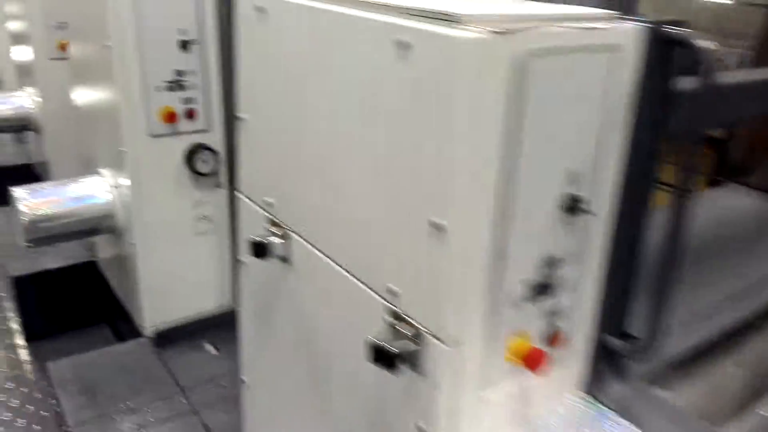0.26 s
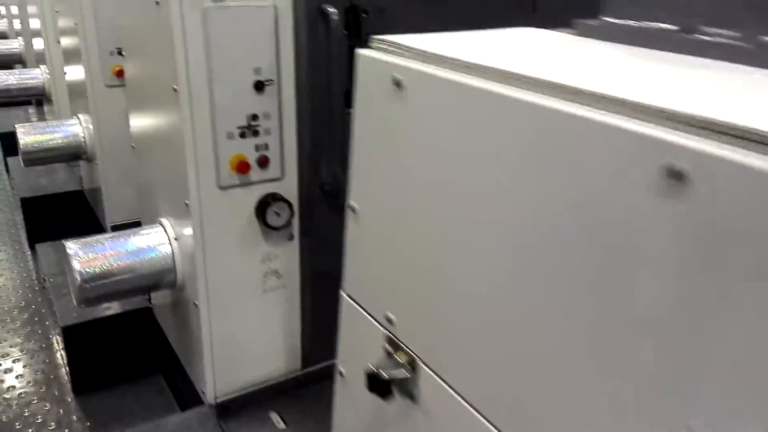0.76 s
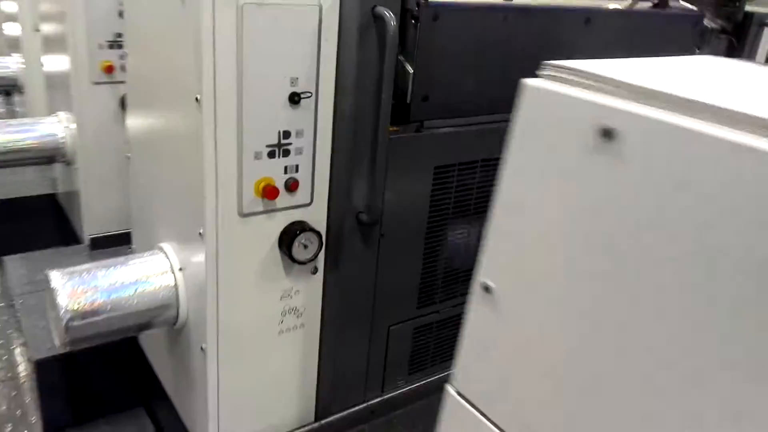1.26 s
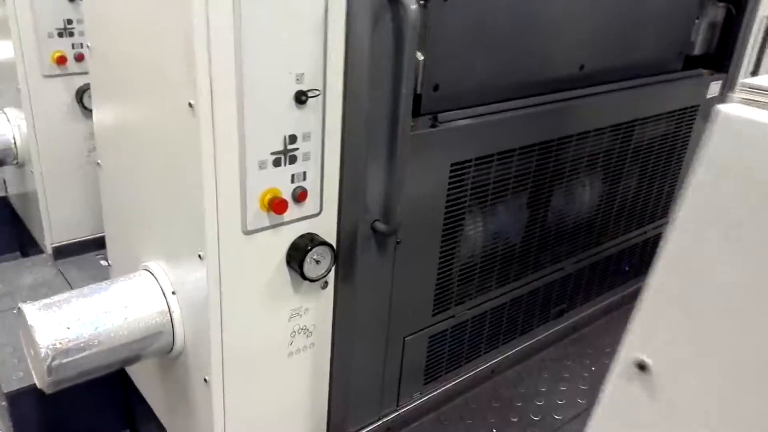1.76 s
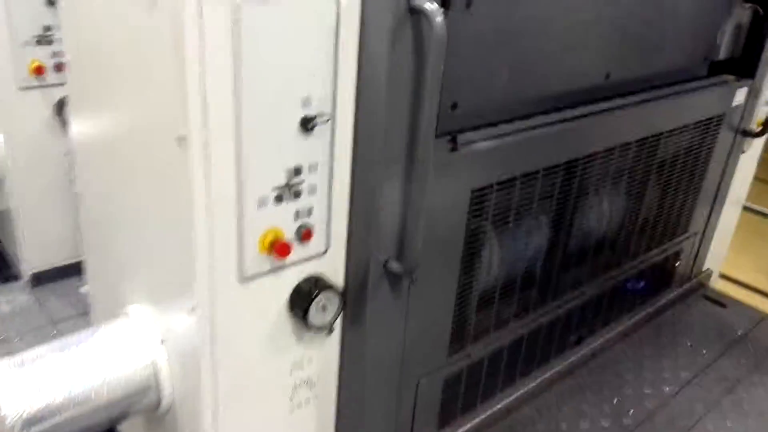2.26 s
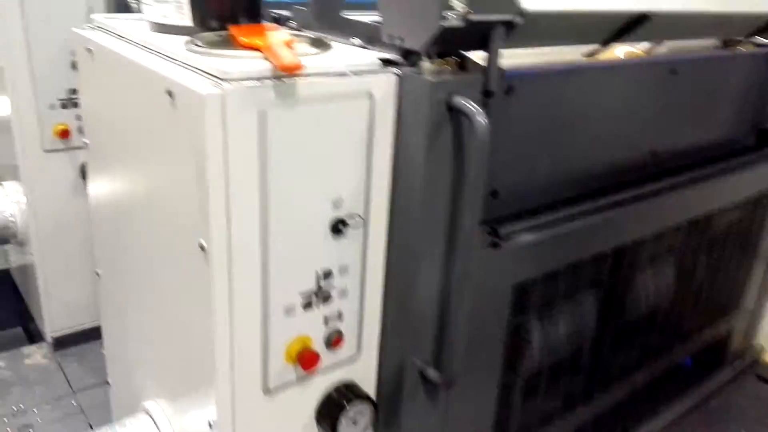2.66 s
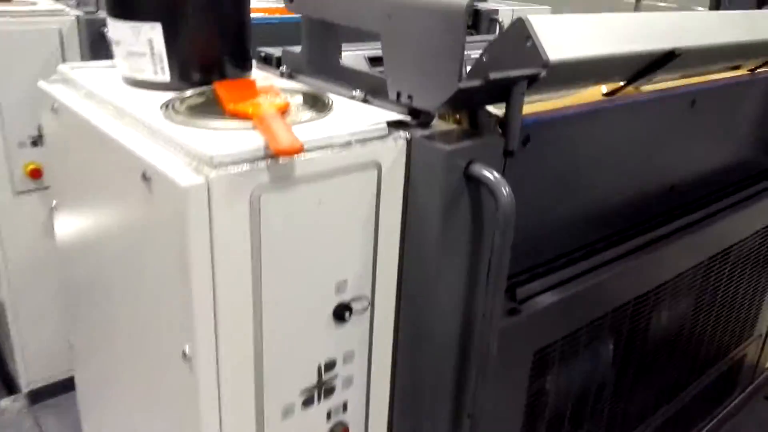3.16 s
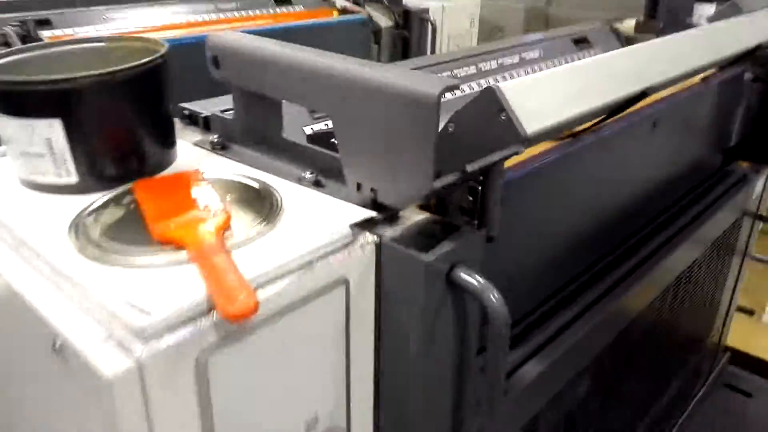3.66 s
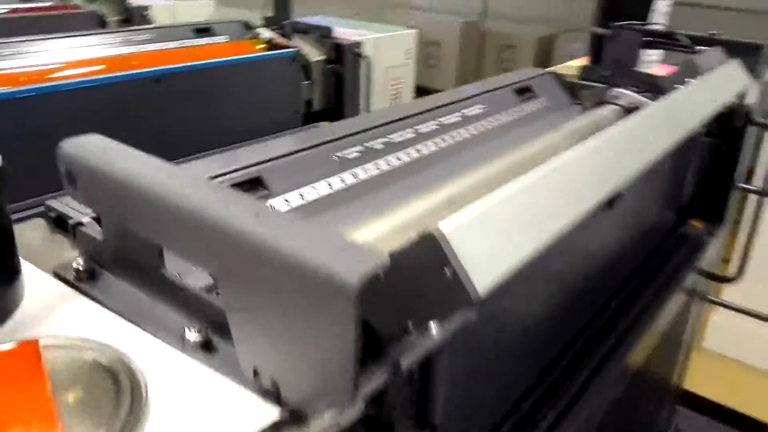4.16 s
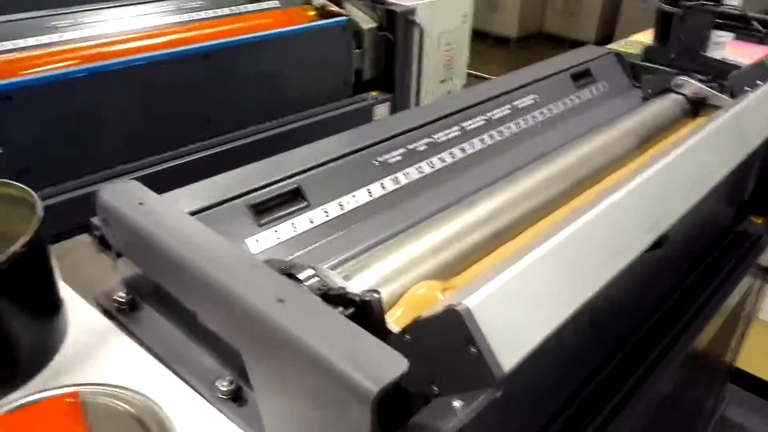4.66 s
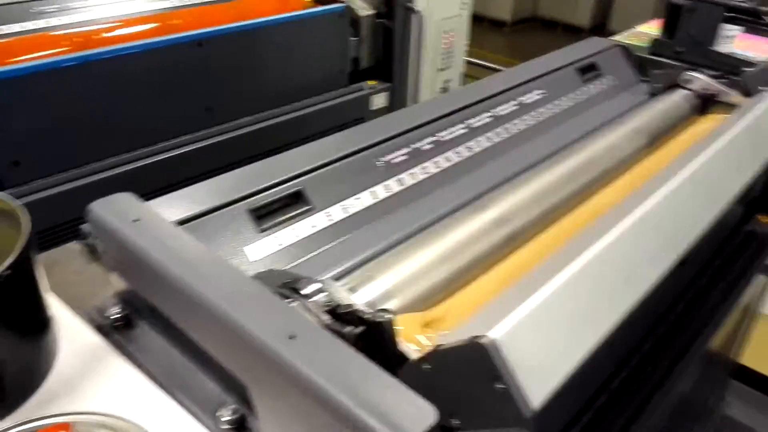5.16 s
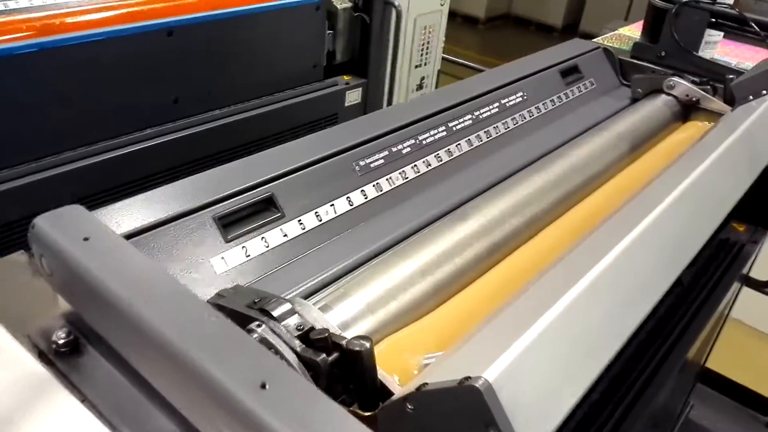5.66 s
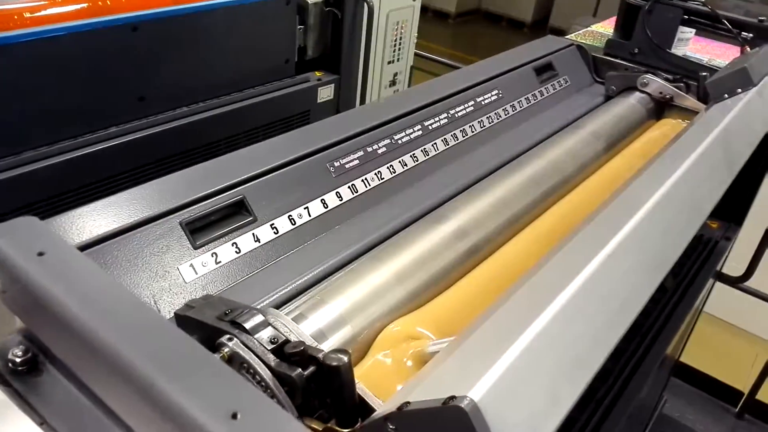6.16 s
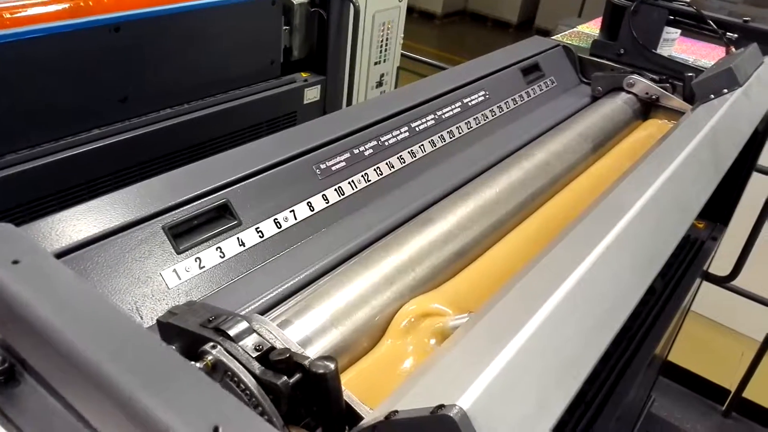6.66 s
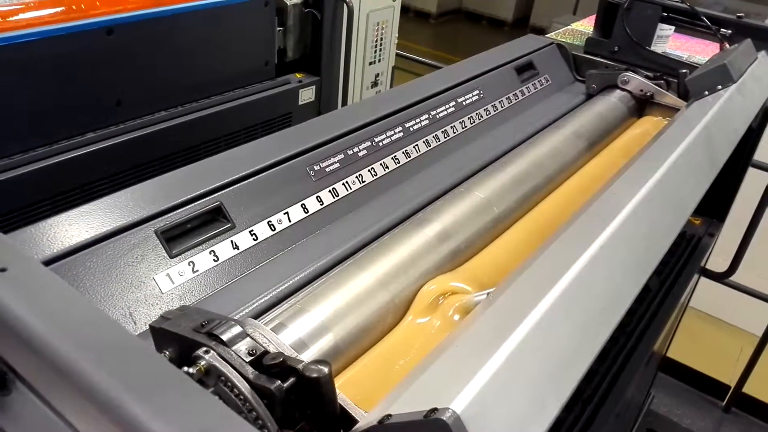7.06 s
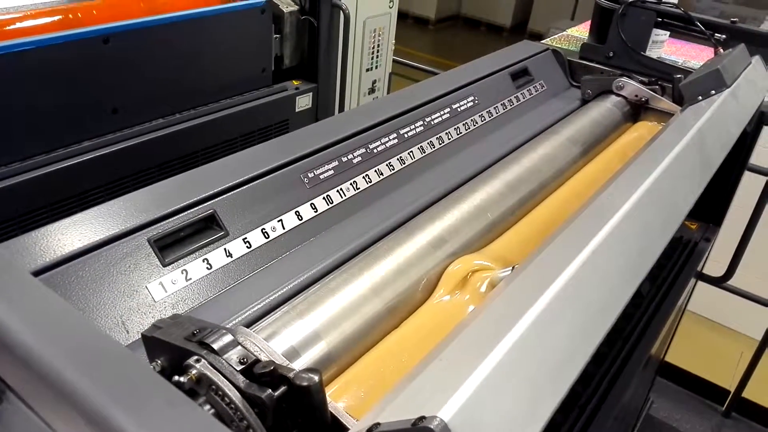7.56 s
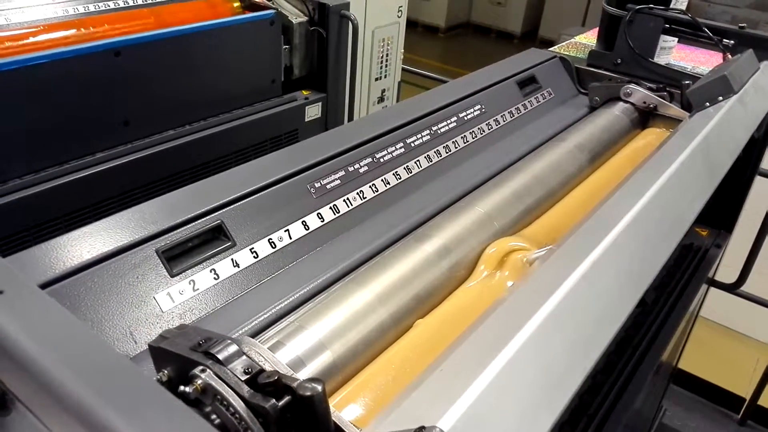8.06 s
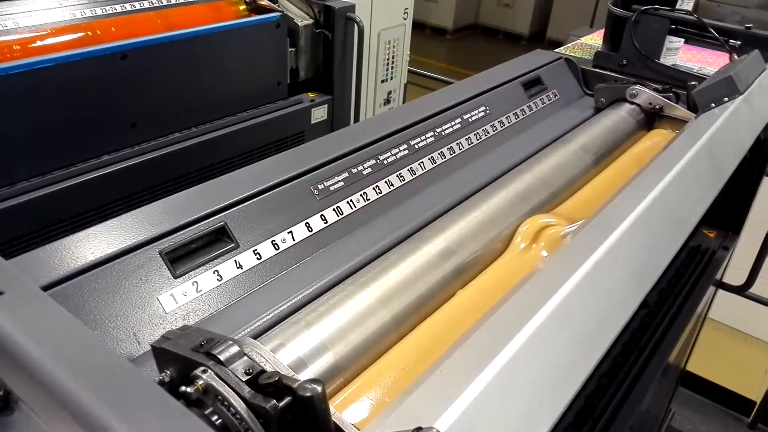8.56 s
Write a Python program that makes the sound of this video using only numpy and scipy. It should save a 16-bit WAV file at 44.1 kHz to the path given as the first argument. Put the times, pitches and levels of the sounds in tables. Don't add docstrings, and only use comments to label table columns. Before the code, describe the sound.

Walking past running presses: constant roaring machinery, wavering gear whine and hum, and quick repeating thumps and steel clacks nearly three cycles a second.

```python
import sys
import numpy as np
from scipy import signal
from scipy.io import wavfile
from scipy.ndimage import uniform_filter1d

SR = 44100
rng = np.random.default_rng(int(sys.argv[2]) if len(sys.argv) > 2 else 0)


def elevation(decibels):
    levels = np.asarray(decibels, float)
    return 10 ** (levels / 20)


def persist_wave(psi):
    counts = np.round(np.clip(psi, -1, 1) * 32767).astype(np.int16)
    wavfile.write(sys.argv[1], SR, np.atleast_2d(counts).T)


N = 388962
TURN_HZ = 2.8359

# (time [s], time [s])
ARRIVES = (2, 4.3)
# (time [s], time [s])
LEANS_IN = (5.5, 7.3)
# (time [s], exposure [dB])
EXPOSURE = [(0, 0.5), (.5, 0.05), (1.4, 0), (2, 0.2), (2.45, 0.5), (2.9, -2), (3.4, -1.1), (4, -1),
            (4.4, -2), (4.9, -2), (7, -1.7), (8.82, -1.5)]

# (time [s], left level [dB], right level [dB], left leads [rad])
WHINE = [(0, -27, -33, .5), (.25, -34, -39, 1.4), (.75, -38, -38, 1.6), (1.13, -31, -39, .7),
         (1.85, -41, -43, 4.7), (2.45, -30, -29, 6.3), (2.72, -42, -31.5, 5.4), (3.17, -38, -29, 5),
         (3.84, -29.5, -44, 4.6), (4.25, -39, -35, 4.5), (4.55, -33, -39, 4.1), (4.98, -31.5, -39, 4.7),
         (5.22, -29.5, -36, 5.6), (5.85, -30.5, -29, 6.15), (6.4, -30.5, -28, 6.2), (6.9, -32, -29.6, 6),
         (8.5, -32.4, -30.8, 5.9), (8.82, -30.5, -28, 6.2)]
MESH = [(0, 0.25, -39, 9), (1.25, 0.37, -30, -1), (1.85, 0.47, -30.5, 0.5), (2.8, .35, -42, -7),
        (3.4, .3, -40, -4), (4.05, 0.22, -37.5, -1), (4.65, 0.48, -37.5, -4)]
HUM = [(.1, 0.17, -29, 1), (1.35, .25, -28.5, 3), (2.0, 0.69, -24.5, -1), (3.15, 0.15, -29, -1),
       (4.95, 0.31, -34, 2), (6.0, 0.26, -33, 3), (7.2, 0.23, -31.5, .1), (8.6, .3, -38.5, 1)]
PARTNER = [
    (.6, .4, -42.5, 10),
    (2.5, 0.59, -27.5, 1.5),
    (4.9, 0.43, -32, 2),
]
BLOWER = [(.35, 0.28, -24.5, .3), (1.75, 0.36, -33, .3), (2.36, 0.27, -22.5, .3), (3.0, 0.075, -25, 0.26),
          (4.0, .2, -31, 0.26), (4.75, 0.45, -35, .3), (5.45, 0.23, -26.5, 0.33), (7.0, .3, -30, .3),
          (8.25, 0.11, -26, .3)]
# (mesh [dB], hum [dB], blower [dB], partner [dB])
BETWEEN_DB = (-42, -42.5, -49, -44.5)
# (time [s], left leads [rad])
MESH_LEAD = [(1.2, 1.8), (1.5, -1.5), (2.4, -1.2), (2.8, -2.6), (3.6, -2.8), (4.1, .5), (4.5, 1.3)]
# (order of the turn [1], level re hum [dB])
BEATING = [
    (53, -8.5),
    (58, -3),
]
# (frequency [Hz], left level [dB], right level [dB])
FAINT = [(21.5, -55, -55), (44.4, -52, -52), (646.7, -52, -50), (794.1, -46, -42), (1588.2, -54, -47),
         (1633.5, -52, -52), (1667.5, -49, -46), (2041.8, -53, -53)]

# (time into turn [s], ring [Hz], t60 [s], level by cabinet [dB], level at fountain [dB])
THUMPS = [(.152, 230, .07, -24, -10), (.238, 270, .08, -13, -13), (.034, 220, .07, -26, -14),
          (.346, 250, .06, -26, -14), (.114, 310, .12, -12, -24), (.186, 280, .09, -18, -15),
          (.270, 260, .04, -26, -16), (.286, 240, .04, -26, -16), (.160, 170, .08, -17, -30),
          (.322, 280, .05, -17, -18), (.074, 280, .06, -18, -18)]
# (frequency [Hz], width [Hz], t60 [s], level [dB])
FINGERS = ([(.0265, .003, -34, -33.5), (.046, .003, -48, -39), (.078, .002, -37, -36),
           (.154, .007, -34, -35), (.207, .001, -48, -36.5), (.225, 0.0047, -39, -43),
           (.292, 0.0018, -35, -34.5), (.311, .002, -40, -40.5), (.341, .001, -55, -44)],
           [(5480, 2780, 0.1, 2.26), (10360, 1250, 0.068, -7), (4560, 7600, 0.039, -5)], 0.0042)
BAR = ([(.028, 0.0047, -30.5, -29.5), (.078, .01, -35, -39), (.154, 0.0071, -31.5, -33.5),
       (.294, .012, -33.5, -34)], [(3420, 1400, 0.17, 1.3), (2938, 190, 0.4, -11), (3626, 160, 0.15, -6),
       (5590, 590, 0.23, -15.5)], 0.0043)
CAM = ([(.028, 0.0027, -30.5, -29), (.154, 0.0063, -26.5, -37), (.208, .003, -34, -31),
       (.232, .003, -41, -34)], [(1584, 860, 0.035, 0.3), (1622, 200, 0.13, -10)], 0.0054)
# (time [s], extra level [dB])
HARD = [
    (3.556, 2.5),
    (4.26, -0.5),
    (6.73, 0.5),
    (7.43, 0.5),
    (5.316, -1),
    (8.49, 0.5),
]

RUMBLE = [(12, -54), (24, -27), (33, -27), (48, -20), (62, -12.5), (95, -3.5), (119, 2), (262, -2),
          (304, 2), (350, -2.5), (468, -16), (700, -14.5), (910, -45), (1540, -120)]
ROAR = [(260, -43), (450, -9.5), (590, -16.5), (709, -9), (815, -3.5), (890, -5.5), (1320, -7),
        (1610, -6.5), (2060, -11.5), (2600, -21.5), (3380, -44), (5720, -120)]
HISS = [(1290, -33), (2200, -4.5), (2500, -1.5), (3640, -1.5), (4270, -3.5), (5890, -3.5), (7290, -9),
        (7730, -18.5), (7900, -36), (10300, -53), (17400, -120)]
FIZZ = [(5470, -32), (9300, -10.5), (9750, 2), (10300, 0), (12000, -5.5), (13300, -10), (13700, -8),
        (14300, -16), (14500, -57)]
# (level [dB], share of exposure [1], gain close to rollers [dB])
LAYERS = [
    (-21, 1, 0.24),
    (-25, 0.96, -0.03),
    (-28.5, 1, 0.4),
    (-43.5, .8, 2),
]
# (frequency [Hz], share of power [1])
REPEATS = [(40, .2), (100, .3), (400, .3), (900, .4), (1800, .2), (3000, .02)]
PLACES = [0, 1.1, 2.1, 3.2, 4.4, 6.2, 9.5]
# (frequency [Hz], likeness [1])
SAME = [(60, .995), (130, .985), (280, .85), (430, .5), (620, .25), (1350, .25), (2600, .15), (13900, .08)]
# (frequency [Hz], left leads [rad])
LEAD = [(0, 0), (430, 0), (620, 1.5), (1030, 1.1), (1810, -1.6), (2840, -4), (5430, -12.4), (14100, -30)]
# (frequency [Hz], left-right [dB])
TILT = [(60, 0), (430, 0), (620, 1), (1240, -3.5), (1500, -4.5), (2270, -2.5), (3200, -1), (4700, -4.5),
        (6300, -5.5), (7600, -2), (9800, -3.5), (12400, 0)]
# (low [Hz], high [Hz], top [Hz])
GAP_HZ = (7750, 9350, 14330)
SPUTTER_HZ, SPUTTER_DB = (10600, 13600), 4.2


def evened(x):
    return x / np.sqrt(np.mean(abs(x) ** 2) + 1e-20)


def read(points, hz):
    f, value = np.transpose(points)
    return np.interp(np.log(hz + 1), np.log(f + 1), value)


def curves(rows, t):
    s, *columns = np.transpose(rows)
    return [np.interp(t, s, c) for c in columns]


def drift(t, rate_hz):
    rates = rate_hz * np.geomspace(.1, 1, num=12)
    return evened(sum(np.sin(2 * np.pi * (f * t + rng.random())) / np.sqrt(f) for f in rates))


def wander(rate_hz):
    return np.repeat(drift(np.arange(0, N, 441) / SR, rate_hz), 441)[:N]


def spots(rows, t, between_db, flutter_db=3.0):
    power = elevation(2 * (between_db + flutter_db * wander(2.0)))
    sides = np.array([[.5], [-.5]])
    for s, half, db, pan_db in rows:
        power = power + elevation(2 * (db + sides * pan_db - 5.7 * ((t - s) / half) ** 2))
    return 10 * np.log10(power)


def tone(hz, left_db, right_db, lead, waver=0.55, crest_s=None):
    t = np.arange(N) / SR
    start = rng.random() if crest_s is None else -hz * crest_s
    phase = 2 * np.pi * (hz * t + start) + waver * wander(3.0)
    return np.sqrt(2) * np.array([elevation(left_db) * np.sin(phase + lead), elevation(right_db) * np.sin(phase)])


def each_turn(s, near_db, far_db, jitter, spread_db, farther=.0):
    luck = rng.standard_normal((int(N / SR * TURN_HZ) + 1, 2))
    at = s + np.arange(len(luck)) / TURN_HZ + jitter * luck[:, 0]
    at += farther * np.interp(at, ARRIVES, (1, 0))
    level_db = np.interp(at, ARRIVES, (near_db, far_db)) + spread_db * luck[:, 1]
    train = np.zeros(N + SR)
    train[np.round(abs(at) * SR).astype(int)] = elevation(level_db)
    return train[:N]


def gears(throb=.6, throb_s=.18, hum_throb=.55):
    t = np.arange(N) / SR
    load = np.cos(2 * np.pi * TURN_HZ * (t - throb_s))
    near = np.interp(t, ARRIVES, (1, 0))
    crest_s = .121
    mesh_db, hum_db, _, partner_db = BETWEEN_DB
    hum = (*spots(HUM, t, hum_db), -.1)

    out = tone(288 * TURN_HZ, *curves(WHINE, t), waver=0.06)
    mesh = tone(144 * TURN_HZ, *spots(MESH, t, mesh_db), *curves(MESH_LEAD, t))
    out += (1 + throb * load) * mesh
    high_db = np.interp(t, (5.1, 6.1), (-44.0, -52.0))
    out += tone(432 * TURN_HZ, high_db, high_db, lead=0.35, waver=0.44)

    pair = tone(111 * TURN_HZ, *hum, waver=0, crest_s=crest_s)
    pair += tone(116 * TURN_HZ, *spots(PARTNER, t, partner_db), -0.13, waver=0, crest_s=crest_s)
    out += elevation(-1.0) * (1 + hum_throb * near * load) * pair
    for order, db in BEATING:
        out += elevation(db - 1.7 * (1.5 - near)) * tone(order * TURN_HZ, *hum)

    for hz, left_db, right_db in FAINT:
        fading = 3.0 * wander(2.7)
        out += tone(hz, left_db + fading, right_db + fading, hz / 400 * rng.standard_normal())
    return out


def thumps():
    t, out = np.arange(SR // 3) / SR, np.zeros(N)
    for s, hz, t60, near_db, far_db in THUMPS:
        ring = np.sin(2 * np.pi * hz * t) * elevation(-60 * t / t60) * (1 - np.exp(-t / 0.0029))
        blows = each_turn(s, near_db, far_db, jitter=0.00036, spread_db=0.8)
        out += signal.oaconvolve(blows, ring)[:N]
    return out * elevation([[.1], [-.1]])


def clacks(rattle_per_s=9000., size_db=1.5, same=.25):
    t, out = np.arange(SR // 4) / SR, np.zeros((2, N))
    sides = np.array([[.5], [-.5]])
    ticks = (rng.random((2, N)) < rattle_per_s / SR) * rng.standard_normal((2, N))
    ticks *= elevation(size_db * rng.standard_normal((2, N)))
    ticks[1] += same * np.roll(ticks[0], shift=8)
    harder = elevation(sum(db * (abs(np.arange(N) / SR - s) < .012) for s, db in HARD))

    for strokes, rings, shut in (FINGERS, BAR, CAM):
        blows = np.zeros(N)
        for s, later, near_db, far_db in strokes:
            blows += each_turn(s, near_db, far_db, jitter=0.0009, spread_db=0.76, farther=later)
        blows *= harder
        for hz, width_hz, t60, db in rings:
            shape = np.minimum(t / shut, 1) * elevation(db - 60 * np.maximum(t - shut, 0) / t60)
            edges = hz * np.exp(np.array([-.5, .5]) * width_hz / hz)
            band = signal.butter(3, edges, "bandpass", fs=SR, output="sos")
            ring = evened(signal.sosfilt(band, ticks))
            out += signal.oaconvolve(blows, shape)[:N] * ring * elevation(read(TILT, hz) * sides)
    return elevation(4.5) * out


def blower():
    return tone(109.0, *spots(BLOWER, np.arange(N) / SR, BETWEEN_DB[2]), .1, waver=0.52)


def repeating():
    patterns = rng.standard_normal((len(PLACES), round(SR / TURN_HZ)))
    t, out = np.arange(N) / SR, np.zeros(N)
    for pattern, here in zip(patterns, np.eye(len(PLACES))):
        out += np.resize(pattern, N) * np.sqrt(np.interp(t, PLACES, here))
    return out


def patchwork(shape, bins, frames):
    blurred = uniform_filter1d(rng.standard_normal(shape), size=bins, axis=0)
    return evened(uniform_filter1d(blurred, size=frames, axis=1))


def din(patchy_db=1.22, swell_db=0.3):
    white = np.array([repeating(), repeating(), *rng.standard_normal((2, N))])
    hz, t, z = signal.stft(white, SR, nperseg=2048, noverlap=1536)
    returning = read(REPEATS, hz)[:, None]
    left, other = np.sqrt(returning) * z[:2] + np.sqrt(1 - returning) * z[2:]

    same = np.clip(read(SAME, hz), 0, 1)[:, None]
    turn = np.exp(-1j * read(LEAD, hz))[:, None]
    tilt = elevation(read(TILT, hz) / 2)[:, None]
    right = same * turn * left + np.sqrt(1 - same ** 2) * other
    pair = np.array([left * tilt, right / tilt])
    pair /= np.sqrt((tilt ** 2 + tilt ** -2 + 2 * same * turn.real) / 4)

    exposure_db, close = curves(EXPOSURE, t)[0], np.interp(t, LEANS_IN, (0, 1))
    power = 0
    for spectrum, (db, share, rollers_db) in zip((RUMBLE, ROAR, HISS, FIZZ), LAYERS):
        shape = elevation(2 * read(spectrum, hz))
        level_db = db + share * exposure_db + rollers_db * close
        power = power + np.outer(shape / shape.mean(), elevation(2 * level_db))

    patches = patchwork(power.shape, bins=8, frames=8)
    sputter = patchwork(power.shape, bins=24, frames=3)
    pair *= elevation(np.interp(hz, SPUTTER_HZ, (0, SPUTTER_DB))[:, None] * sputter)
    pair *= np.sqrt(power) * elevation(patchy_db * patches + swell_db * drift(t, 6.0))
    return signal.istft(pair, SR, nperseg=2048, noverlap=1536)[1][:, :N]


def scene():
    return gears() + thumps() + clacks() + blower() + din()


def low_pass(x):
    return signal.sosfilt(signal.butter(12, 14530, fs=SR, output="sos"), x)


def record(dry):
    stop = signal.firwin(601, GAP_HZ, window=("kaiser", 8), fs=SR)
    mix = signal.oaconvolve(dry, stop[None], "same") + .0012
    return low_pass(mix)


dry = scene()
out = record(dry)
persist_wave(out)
```